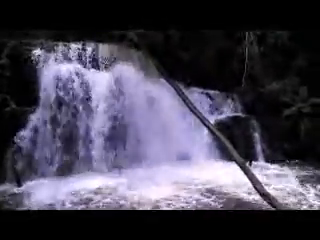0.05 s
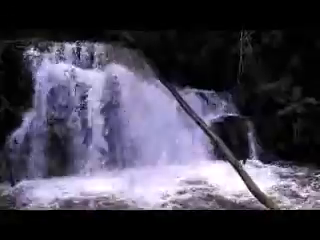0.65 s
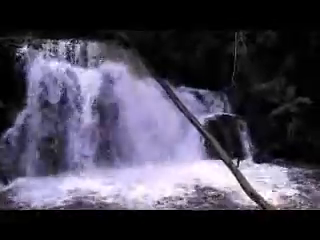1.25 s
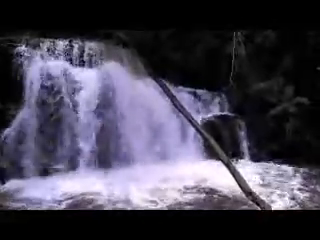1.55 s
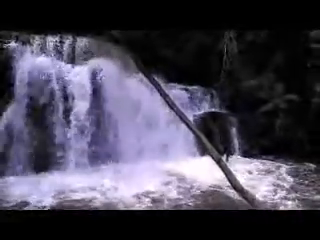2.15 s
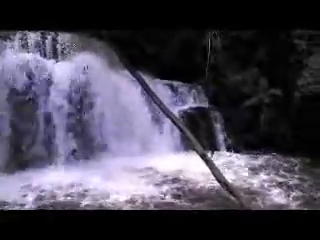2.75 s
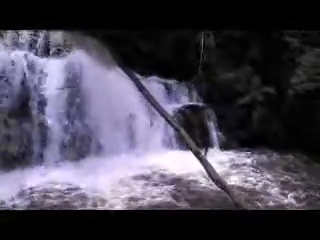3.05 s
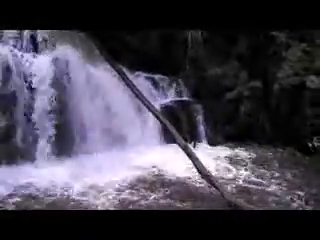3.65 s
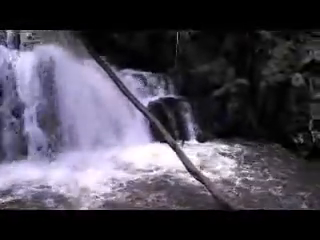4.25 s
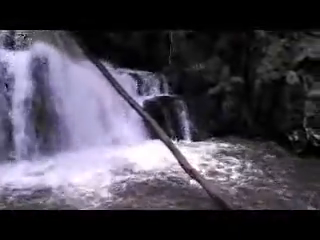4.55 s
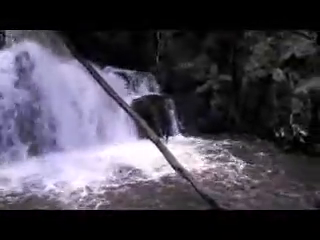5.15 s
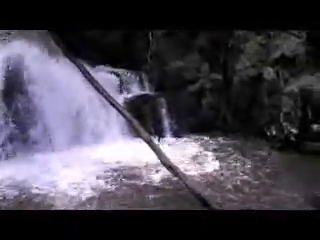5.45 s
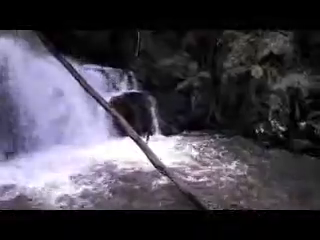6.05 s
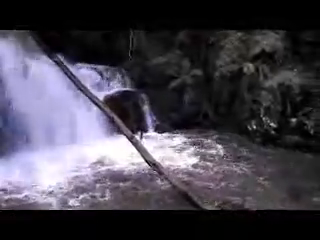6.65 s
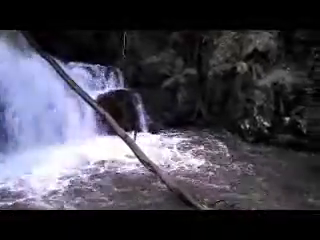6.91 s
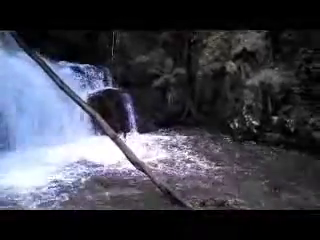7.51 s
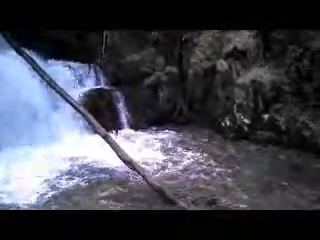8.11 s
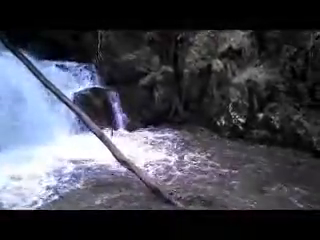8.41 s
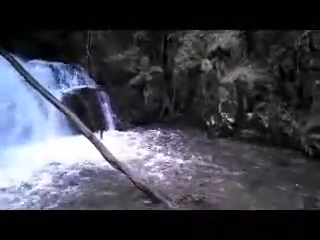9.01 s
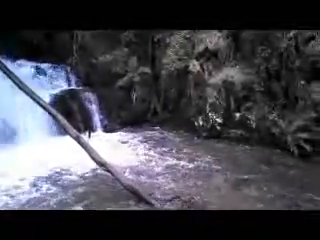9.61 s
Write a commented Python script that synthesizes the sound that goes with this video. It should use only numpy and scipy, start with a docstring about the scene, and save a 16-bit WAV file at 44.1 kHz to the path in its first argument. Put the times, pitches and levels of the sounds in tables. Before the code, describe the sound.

A waterfall pours into a pool with a steady rushing roar and hiss, with light wind buffeting the microphone and a few small knocks.

```python
"""A forest pool under a waterfall in heavy flow, on the two microphone ports of a hand-held camera.
The plunge roars and glugs as it drags air under; spray hisses as drops and bubbles burst in the foam.
The camera is near enough for the fall's draught to buffet its ports. It slowly turns away and is
knocked a few times, and now and then the level dips briefly. It widens its stereo by subtracting
a delayed copy of each port from the other."""
import sys
import numpy as np
from scipy import signal
from scipy.fft import rfft, irfft, next_fast_len
from scipy.io import wavfile
from scipy.ndimage import uniform_filter1d, map_coordinates

SR = 44100
rng = np.random.default_rng(int(sys.argv[2]) if len(sys.argv) > 2 else 0)


def pcm_store(signal):
    """Save signal as 16-bit PCM."""
    levels = np.round(np.clip(np.atleast_2d(signal), -1, 1) * 32767)
    wavfile.write(sys.argv[1], SR, levels.astype(np.int16).T)


N = 430857


def amp(db):
    """Decibels to gain."""
    return 10 ** (np.asarray(db) / 20)


def unit(x):
    """x at rms 1."""
    return x / np.sqrt(np.mean(x ** 2) + 1e-20)


def along(points, hz):
    """Each column of a table after its frequency column, read at hz on a log axis."""
    knots, *columns = np.transpose(points)
    return [np.interp(np.log(hz + 1), np.log(knots + 1), column) for column in columns]


def wobble(rate):
    """A smooth random curve, rate knots a second."""
    knots = rng.standard_normal(int(N * rate / SR) + 4)
    return map_coordinates(knots, [np.arange(N) * rate / SR])


def filtered(x, response):
    """x through a filter given as a complex function of frequency."""
    size = next_fast_len(N + SR // 2)
    return irfft(rfft(x, size) * response(np.fft.rfftfreq(size, 1 / SR)), size)[..., :N]


def dips():
    """Gain of the brief dips: the level drops quickly, holds and creeps back."""
    # dips in level: (time [s], depth [dB], hold [s])
    drops = [(2.153, 1.8, 0.084), (2.743, 2, 0.15), (4.45, 0.8, .05), (5.726, 1.5, .045), (6.287, 2, 0.084),
             (8.393, 2, 0.037), (8.813, 1.5, .04)]
    fall_s, recovery_s = 0.011, 0.026
    t = np.arange(N) / SR
    loss_db = np.zeros(N)
    for at, depth_db, hold in drops:
        onset = np.clip((t - at) / fall_s, 0, 1)
        loss_db += depth_db * onset * np.exp(-np.maximum(t - at - hold, 0) / recovery_s)
    return amp(-loss_db)


def handling():
    """A dead knock on the camera body, then a short rub that sinks in pitch as the hand slows."""
    # shifts of the grip: (time [s], knock level [dB], knock pitch [Hz], rub level [dB], rub length [s])
    knocks = [(4.836, -15, 497, -29, 0.023), (6.476, -11, 613, -38, 0.023), (8.149, -14, 1085, -35, 0.064),
              (8.232, -17, 540, -42, .015), (8.309, -20, 546, -44, 0.018)]
    ring_s, rub_sag_per_s = 0.0034, 3
    out, t = np.zeros(N + SR), np.arange(SR // 4) / SR
    for at, knock_db, hz, rub_db, length in knocks:
        knock = np.sin(2 * np.pi * hz * t) * amp(-60 * t / ring_s)
        # the rub is a band of noise that starts a little above the knock's pitch
        lowpass = signal.butter(2, 0.22 * hz, fs=SR, output="sos")
        grain = signal.sosfilt(lowpass, rng.standard_normal((2, len(t))))
        phase = 2 * np.pi * np.cumsum(1.2 * hz * np.exp(-rub_sag_per_s * t)) / SR
        rub = unit(grain[0] * np.cos(phase) + grain[1] * np.sin(phase)) * np.exp(-(t / length) ** 2)
        out[round(at * SR):][:len(t)] += amp(knock_db) * knock + amp(rub_db) * rub
    return out[:N]


def gusts():
    """Strength of the draught: over a light breeze, each gust swells and dies a little more slowly."""
    # gusts off the fall: (peak time [s], peak strength [dB], decay [s])
    puffs = [(0.09, -36, .15), (0.54, -37, .08), (0.707, -31, .07), (1.09, -31.5, .08), (1.27, -32, 0.14),
             (1.477, -25.5, 0.047), (1.722, -29.5, 0.28), (2.69, -34, 0.13), (3.0, -34, .13),
             (3.52, -39, 0.28), (4.17, -34, .1), (4.46, -35, 0.14), (4.85, -40, .2), (5.9, -41, .08),
             (6.09, -36, .12), (6.48, -43, .12), (6.75, -43, .16), (7.85, -33.5, 0.12), (8.03, -28, 0.073),
             (8.25, -36, .07), (9.07, -30, 0.18), (9.3, -35, .22)]
    breeze_db, rise_share = -52, 0.87
    t = np.arange(N) / SR
    power = amp(breeze_db) ** 2
    for at, db, decay in puffs:
        width = decay * np.where(t < at, rise_share, 1)
        power = power + (amp(db) * np.exp(-((t - at) / width) ** 2)) ** 2
    return np.sqrt(power)


def draught():
    """Eddies hit each port separately; the harder the gust, the higher its rumble reaches."""
    # spectrum of wind on the ports: (frequency [Hz], relative level [dB])
    buffet = [(20, -36), (36, -19), (50, -3), (68, 1), (95, 0), (150, -4), (240, -8), (420, -19),
              (900, -45)]
    flutter_above_hz, full_flutter_db = 110, -32
    rumble = unit(filtered(rng.standard_normal((2, N)), lambda hz: amp(along(buffet, hz)[0])))
    deep = filtered(rumble, lambda hz: 1 / (1 + (hz / flutter_above_hz) ** 4))
    eddies = unit(amp(1.2 * np.array([wobble(22), wobble(22)])))
    strength = gusts()
    flutter = (rumble - deep) * (strength / amp(full_flutter_db)) ** 0.36
    return strength * eddies * (deep + flutter)


def glugs():
    """Each pocket of air dragged under breaks into ten large bubbles that ring, rising in pitch."""
    # air pockets in the pool: (middle time [s], level [dB], pitch [Hz], length [s])
    pockets = [(0.81, -36, 540, .08), (0.998, -35.5, 467, 0.095), (1.28, -36.5, 520, 0.1),
               (1.658, -39, 635, .05), (1.842, -37, 530, .07), (2.345, -37, 620, 0.052),
               (3.265, -35, 487, 0.055), (3.691, -37, 539, 0.077), (4.161, -35.5, 574, .07),
               (4.853, -33, 566, 0.053), (4.957, -39, 547, .09), (5.388, -39, 546, .1),
               (8.324, -37, 560, 0.031)]
    pitch_scatter, ring_s, rise_per_s = 0.064, 0.055, 1
    out, t = np.zeros(N + SR), np.arange(SR // 3) / SR
    for at, db, hz, length in pockets:
        start = length * rng.random((10, 1))
        pitch = hz * np.exp(pitch_scatter * rng.standard_normal((10, 1)))
        age = np.maximum(t - start, 0)
        rings = np.sin(2 * np.pi * pitch * age * (1 + rise_per_s * age / 2))
        attack = 1 - np.exp(-age * pitch / 2)
        glug = (rings * attack * amp(-60 * age / ring_s)).sum(axis=0)
        glug *= np.sqrt(length * SR / np.sum(glug ** 2))
        out[round((at - length / 2) * SR):][:len(t)] += amp(db) * glug
    return out[:N]


def churn(patchy_db):
    """Churning water: two unrelated noises whose level wanders in patches of time and pitch."""
    spectra = signal.stft(rng.standard_normal((2, N)), nperseg=512)[2]
    patches = uniform_filter1d(rng.standard_normal(spectra.shape[1:]), size=6, axis=0)
    patches = unit(uniform_filter1d(patches, size=12, axis=1))
    return unit(signal.istft(spectra * amp(patchy_db * patches), nperseg=512)[1][:, :N])


def bubbles(lo_hz, hi_hz, cycles, rise, spread_db, count, samples):
    """Two swarms of damped rings, each rising in pitch as its bubble nears the surface."""
    when, pitch, loudness, swarm = rng.random((count, 4)).T[:, :, None]
    hz = lo_hz + (hi_hz - lo_hz) * pitch
    turns = hz * np.arange(samples) / SR
    age = turns / cycles
    ring = np.sin(2 * np.pi * turns * (1 + rise * np.minimum(age, 2) / 2)) * np.exp(-2 * age)
    strength = amp(-spread_db * np.log(1 - 0.99 * loudness)) * hz  # many faint, a few louder
    at = (when * (N - samples)).astype(int) + np.arange(samples) + N * (swarm > 0.5)
    return unit(np.bincount(at.ravel(), (strength * ring).ravel(), 2 * N).reshape(2, N))


def at_ports(pair, band):
    """Water noise at both ports: nearly the same in the bass, unrelated in the treble."""
    # falling water at the left port: (frequency [Hz], relative level [dB])
    water_spectrum = [(30.0, -10), (60.0, 2), (100.0, 0.5), (180.0, 2.5), (240.0, 0.94), (350.0, -4),
                      (480.0, -4), (620.0, -6.5), (800.0, -11.5), (1200.0, -12.7), (1500.0, -11.5),
                      (1850, -11.5), (2100, -14), (2500.0, -15.5), (3300.0, -13), (4400.0, -14),
                      (6100.0, -16.5), (7100, -15), (8400.0, -13), (10000.0, -18.5), (10800, -20.5),
                      (11500.0, -38.5)]
    # right port against left: (frequency [Hz], level [dB], likeness [0-1], phase lag [rad])
    right_port = [(65.0, -2.0, 0.97, 0.22), (230.0, -0.4, 0.98, 0.18), (380.0, -0.8, 0.83, 0.5),
                  (500.0, -3.1, 0.8, 0.3), (700.0, -0.2, 0.85, 0.52), (1000.0, -2.0, 0.42, 1.2),
                  (1250.0, -1.5, 0.45, 0.85), (1500.0, -0.9, 0.8, 2.5), (1800, -2.0, 0.55, 2.7),
                  (2100.0, -0.8, 0.35, 3.3), (2600.0, -2.0, 0.0, 3.0), (3300, -3.2, 0, 3),
                  (4600.0, -3.3, 0.0, 3.0), (7800.0, -7.0, 0.0, 3.0), (9000, -6.2, 0, 3),
                  (11000.0, -1.8, 0.0, 3.0)]

    def mixing(hz):
        right_db, alike, lag = along(right_port, hz)
        left = [np.ones_like(hz), np.zeros_like(hz)]
        right = amp(right_db) * np.array([alike * np.exp(-1j * lag), np.sqrt(1 - alike ** 2)])
        return np.array([left, right]) * amp(along(water_spectrum, hz)[0]) * band(hz)
    return unit(filtered(pair, mixing).sum(axis=1))


def roar_share(hz, split_hz=3080):
    """Crossover, in power: above the split the plunge's roar gives way to the spray's hiss."""
    return 1 / (1 + (hz / split_hz) ** 6)


def spray():
    """Drops patter on rock and foam and merge into a hiss."""
    hiss = churn(patchy_db=1.0)
    patter = bubbles(2200, 11300, cycles=3.8, rise=0.17, spread_db=3.5, count=30000, samples=90)
    fizz = unit(hiss + amp(-12) * patter)
    flutter_db = 0.031 * wobble(8.6) + 0.094 * wobble(35)
    return amp(-28.5 + flutter_db) * at_ports(fizz, lambda hz: np.sqrt(1 - roar_share(hz)))


def plunge():
    """Sheets of water drive clouds of large bubbles into the pool, in slight, uneven surges."""
    wash = churn(patchy_db=-0.08)
    cloud = bubbles(275.5, 2620, cycles=8.8, rise=0.064, spread_db=0.8, count=6000, samples=800)
    roar = unit(wash + amp(-12.5) * cloud)
    surge_db = 0.091 * wobble(4) + 0.26 * wobble(14)
    return amp(-25.5 + surge_db) * at_ports(roar, lambda hz: np.sqrt(roar_share(hz)))


def waterfall():
    """Plunge and spray run steadily, a little duller and softer as the microphones turn off axis."""
    # shading by the camera body when fully turned away: (frequency [Hz], gain [dB])
    body_shade = [(250, -0.3), (600, -0.1), (1000, -1), (1400, -4), (1850, -2.5), (2500, 0.9), (3500, -3.5),
                  (4700, -0.7), (9000, -0.1)]
    turn_start_s, turn_end_s, facing_db, turned_db = 0.8, 8.9, -0.17, -0.38
    t = np.arange(N) / SR
    turned = np.clip((t - turn_start_s) / (turn_end_s - turn_start_s), 0, 1) ** 0.68  # fastest at first
    direct = amp(facing_db + turned * (turned_db - facing_db)) * (plunge() + spray())
    shaded = filtered(direct, lambda hz: amp(along(body_shade, hz)[0]))
    return direct + turned * (shaded - direct)


def scene():
    """The sound at the left and right port."""
    return (waterfall() + glugs() + draught() + handling()) * dips()


def record(dry):
    """Each channel loses a delayed copy of the other port: a wider image with deep, narrow notches."""
    # widened sound fed back across: (frequency [Hz], share [0-1])
    cross_return = [(1600, 0.013), (2300, 0.078)]
    # right channel over left, midway between notches: (frequency [Hz], gain [dB])
    right_tilt = [(500, -0.2), (1200, -0.5), (3300, 2.7), (8000, 2.8)]
    delay_samples, cross_share, top_hz = 16, 0.998, 11650

    def lag(hz):
        return 2 * np.pi * hz * delay_samples / SR

    def widening(hz):
        delayed = np.outer([1, -1], np.exp(-1j * lag(hz)))  # opposite signs for mid and side
        return (1 - cross_share * delayed) / (1 - along(cross_return, hz)[0] * delayed)

    def balance(hz):
        tilt_db = along(right_tilt, hz)[0] * np.sin(lag(hz)) ** 2
        return amp(np.outer([-0.5, 0.5], tilt_db))

    left, right = dry
    mid, side = filtered(np.array([left + right, left - right]) / 2, widening)
    return filtered(np.array([mid + side, mid - side]), lambda hz: balance(hz) * (hz < top_hz))


dry = scene()
out = record(dry)
pcm_store(out)
```